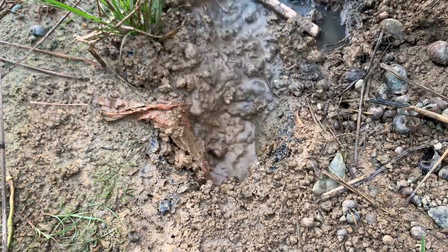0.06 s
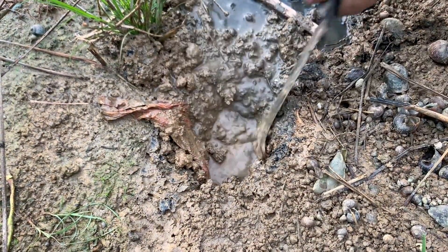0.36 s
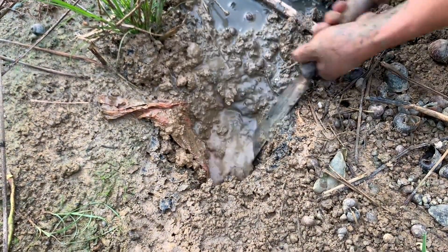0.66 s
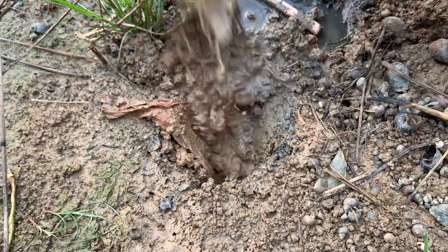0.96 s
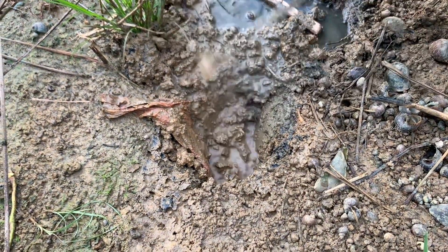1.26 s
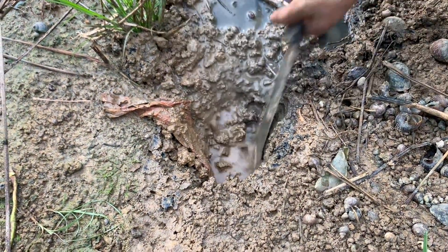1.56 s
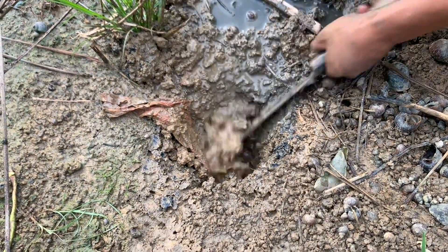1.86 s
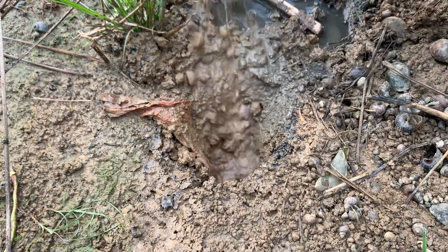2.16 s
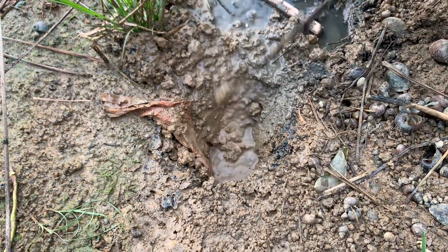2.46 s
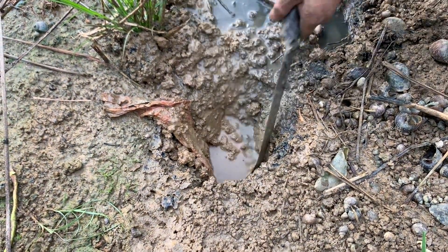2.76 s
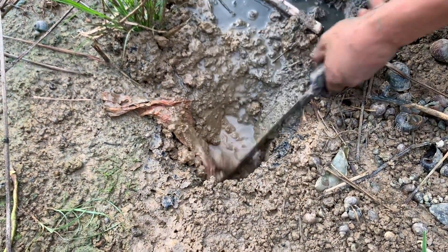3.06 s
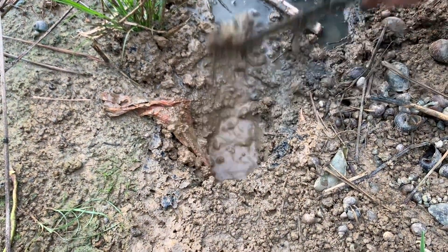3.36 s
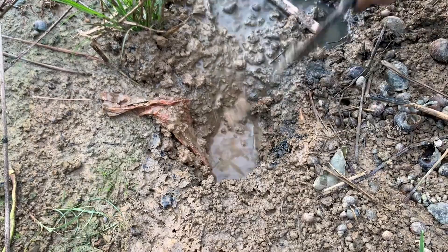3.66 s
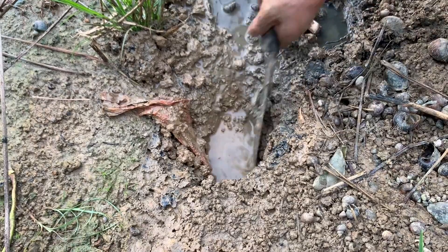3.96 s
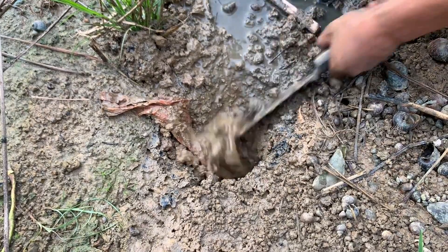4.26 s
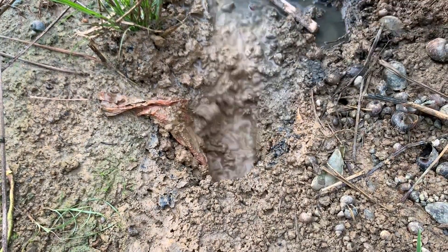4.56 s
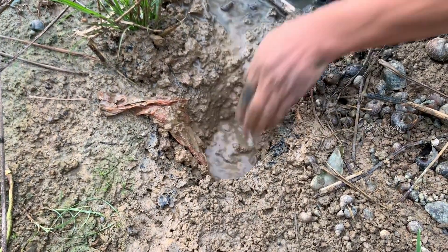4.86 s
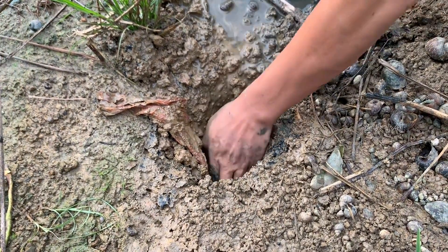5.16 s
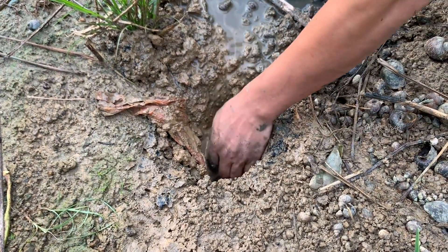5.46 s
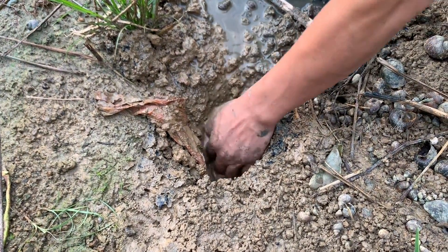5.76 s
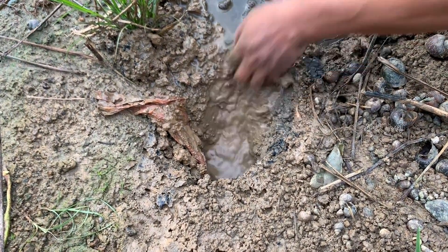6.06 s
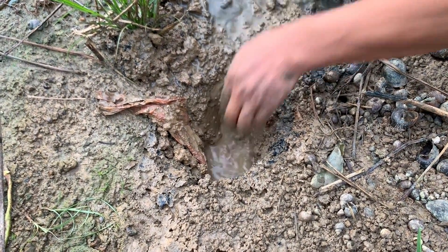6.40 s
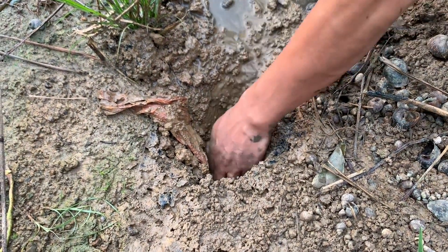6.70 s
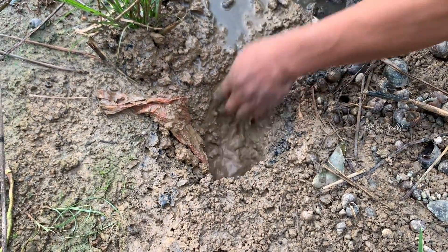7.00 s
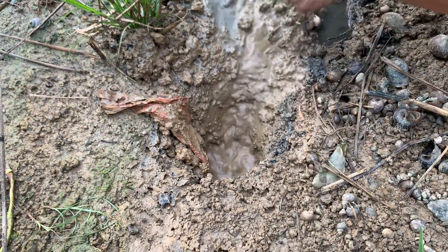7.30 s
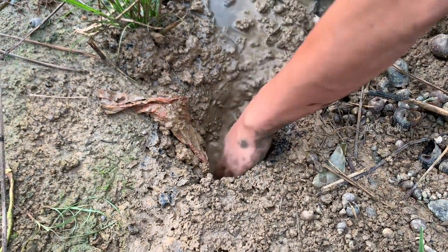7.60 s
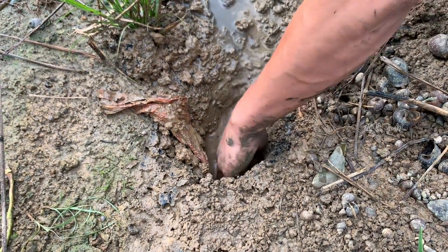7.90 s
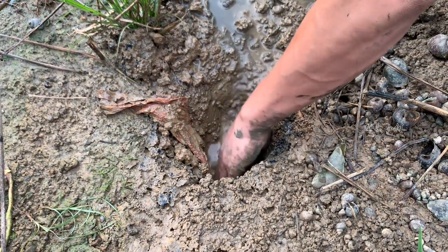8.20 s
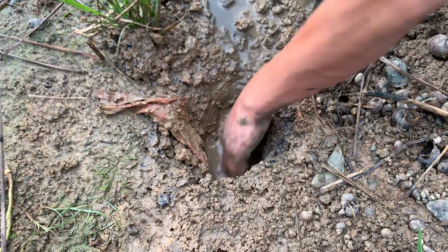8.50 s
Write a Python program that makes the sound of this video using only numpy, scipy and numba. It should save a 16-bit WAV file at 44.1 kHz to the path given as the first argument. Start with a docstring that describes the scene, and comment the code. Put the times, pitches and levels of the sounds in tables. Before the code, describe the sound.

Wet mud is dug from a small waterlogged hole outdoors, close to the microphone. From the start to about 4.8 seconds, a stick scoops in quick, irregular strokes that squelch, squish and crackle with grit, while clods smack down and small bubbles plip. The stick knocks on firm ground at about 1.4, 2.3, 2.7 and 3.7 seconds, hardest at 2.3. Around 5 seconds the digging drops to soft kneading by a bare hand. Two louder wet scoops follow near 6.2 and 7 seconds, then only faint ticks and one plip at 8.1.

Far off, a slow one-cylinder engine chugs throughout. Low traffic rumble and motor hum swell around 2 to 4 seconds, then ease, with a distant motor falling in pitch until about 7. Insects shrill faintly over soft outdoor air, and a small bird gives thin, raspy chirps at about 2 and 6 seconds.

```python
"""Wet mud, scooped from a small waterlogged hole by a stick, then a bare hand, close to the microphone.
It tears in tiny slips, crackles with bursting pockets and grit, and squishes through gaps;
clods smack down, bubbles plip, the stick knocks on firm ground.
Far off, a slow one-cylinder engine rings its exhaust and traffic rumbles by.
Insects shrill; a small bird calls twice."""
import sys
import numpy as np
from scipy import signal
from scipy.fft import rfft, irfft, next_fast_len
from scipy.io import wavfile
from scipy.ndimage import uniform_filter1d
from numba import njit

SR = 44100
rng = np.random.default_rng(int(sys.argv[2]) if len(sys.argv) > 2 else 0)


def inscribe(sig):
    """Save sig as 16-bit PCM at rate SR to the path in sys.argv[1].

    A 1-D sig is mono; a 2-D sig holds one channel per row.
    Samples are clipped to [-1, 1] before scaling.
    """
    pcm = np.round(np.clip(np.atleast_2d(sig).T, -1, 1) * 32767)
    wavfile.write(sys.argv[1], SR, pcm.astype(np.int16))


N = 376613
T = np.arange(N) / SR
FREQ = np.maximum(np.arange(N // 2 + 1) * SR / N, 1)

# wet mud spectrum: f/Hz, level/dB
SQUELCH = [(410, -35), (700, 6), (1110, -3.5), (2100, -5), (2330, -8), (3030, -4), (3740, -5), (5000, -5.5),
           (5830, -16.5), (7000, -3.5), (9100, -101), (15400, -120)]
# spectrum of grit and bursting films: f/Hz, level/dB
FIZZ = [(3240, -39), (5500, -9.5), (6070, -7.5), (7130, -16.5), (7930, -8), (9110, -6), (10500, -12.5),
        (11300, -27.5), (12600, -11), (13900, -16.5), (15200, -26), (16000, -39)]
# mud smacks: t/s, level/dB, ring f/Hz, treble offset/dB
SMACKS = [(0.131, -36, 3180, -6), (0.3928, -27.5, 3760, -17), (0.6482, -27.5, 1150, -18),
          (0.7545, -27, 3850, -26), (0.848, -35.5, 2100, 6.5), (0.86, -28, 1480, -20),
          (0.9016, -24.5, 4050, -14), (1.0342, -28.5, 2900, -14), (1.152, -30, 3140, -9),
          (1.1983, -29, 1260, -1.5), (1.3544, -27, 4400, -18), (1.439, -33, 3620, -18),
          (1.829, -37, 2070, -1), (2.081, -30, 1410, -12), (2.23, -35.5, 2900, -22),
          (2.673, -23, 3940, -16), (2.9718, -35.5, 3120, -11.5), (3.041, -24.5, 4700, -16),
          (3.113, -23, 4200, -8.5), (3.2012, -31.5, 3430, -2.5), (3.293, -33, 3700, -8),
          (3.7639, -28, 1300, -15), (4.2216, -34, 2900, -18), (4.3526, -42, 1600, -3),
          (4.553, -35.5, 2960, -7.5), (4.631, -35.5, 3020, -20), (5.9, -32, 1720, -16),
          (6.1346, -25, 1290, -5.5), (6.1348, -21, 3000, -20), (6.1535, -31, 2300, -20),
          (6.2598, -30.5, 1280, -14), (6.2987, -33, 4100, -24), (6.58, -38.5, 1460, -5.5),
          (6.8832, -29.5, 1560, -14), (6.9133, -28.5, 1490, -19), (6.9638, -32, 1700, -8),
          (7.1465, -30.5, 4200, -4.5), (7.164, -32, 1900, -10)]
# stick knocks: t/s, level/dB, favoured f/Hz, crack offset/dB, spray level/dB
KNOCKS = [(1.3994, -25, 4400, -3, -54), (2.2982, -14.5, 2700, -2, -48), (2.6704, -21, 1700, -12, -53),
          (3.7472, -16.5, 1400, -5, -41)]


def undb(db):
    """Decibels to gain."""
    return 10 ** (np.asarray(db) / 20)


def unit(x):
    """Scale to rms 1."""
    return x / np.sqrt(np.mean(x ** 2) + 1e-30)


def by_hz(table):
    """Table read at FREQ, on a log axis."""
    hz, value = np.transpose(table)
    return np.interp(np.log(FREQ), np.log(hz), value)


def filtered(x, response):
    """Apply a response given on FREQ."""
    size = next_fast_len(N + SR // 4)
    grid = np.arange(size // 2 + 1) * SR / size
    return irfft(rfft(x, size) * np.interp(grid, FREQ, response), size)[..., :N]


def coloured(x, spectrum, size=1024):
    """Minimum-phase filter: no ringing ahead of a click; white noise keeps its power."""
    hz, db = np.transpose(spectrum)
    grid = np.maximum(np.arange(size // 2 + 1) * SR / size, 1)
    cepstrum = irfft(np.log(undb(np.interp(np.log(grid), np.log(hz), db))))
    cepstrum[1:size // 2] *= 2
    cepstrum[size // 2 + 1:] = 0
    response = irfft(np.exp(rfft(cepstrum)))
    return signal.oaconvolve(x, response[None] / np.linalg.norm(response))[:, :N]


def resonance(hz, width_hz):
    """One resonance, gain 1 at centre."""
    return 1 / (1 + 1j * (FREQ ** 2 - hz ** 2) / (FREQ * width_hz))


def walk(rate_hz):
    """Smooth random wander, rms 1."""
    hold = int(SR / rate_hz)
    steps = np.repeat(rng.standard_normal(N // hold + 1), hold)
    return unit(uniform_filter1d(steps, hold)[:N])


def gate(start_s, hold_s, attack_s, release_s):
    """Envelope: exponential rise up to start_s, hold, exponential decay."""
    before = np.maximum(start_s - T, 0) / attack_s
    after = np.maximum(T - start_s - hold_s, 0) / release_s
    return np.exp(-np.minimum(before + after, 30))


def sine(hz):
    """Sine along a pitch curve."""
    return np.sin(2 * np.pi * np.cumsum(hz) / SR)


def diffuse_noise():
    """Stereo noise of a far sound field."""
    # left-right likeness: f/Hz, coherence
    coherence = [(30, 0.96), (60, 1), (130, 0.89), (290, 0.94), (640, 0.38), (1410, -0.37), (3100, 0.12),
                 (15000, 0.07)]
    alike = np.clip(by_hz(coherence), -1, 1)
    mid = filtered(rng.standard_normal(N), np.sqrt((1 + alike) / 2))
    side = filtered(rng.standard_normal(N), np.sqrt((1 - alike) / 2))
    return np.array([mid + side, mid - side])


def scatter(x, t60_s):
    """Short diffuse tail, different in each ear."""
    age = np.arange(SR // 6) / SR
    tail = rng.standard_normal((2, len(age))) * undb(-60 * age / t60_s) * (age > .001)
    return signal.oaconvolve(x, tail / np.linalg.norm(tail, axis=1, keepdims=True), axes=1)[:, :N]


@njit
def rings(start_s, hz, cycles, gain, pan, rise):
    """Damped sines: 60 dB down after `cycles`, pitch up by the fraction `rise`."""
    out = np.zeros((2, N))
    for k in range(len(start_s)):
        first, count = int(start_s[k] * SR), int(cycles[k] * SR / hz[k]) + 2
        phase = 0.
        for i in range(max(0, min(count, N - first))):
            age = i / count
            phase += 2 * np.pi * hz[k] * (1 + rise * age) / SR
            sample = gain[k] * np.sin(phase) * np.exp(-6.9 * age) * (1 - np.exp(-phase / 7))
            out[0, first + i] += sample * (1 + pan[k])
            out[1, first + i] += sample * (1 - pan[k])
    return out


def grains(per_s, low_hz, high_hz, cycles, spread_db, rise, max_pan=.6):
    """Shower of tiny bursts of every size; even spectrum, rms 1."""
    when, pitch, life, strength, place = rng.random((int(per_s * N / SR), 5)).T
    hz = low_hz * (high_hz / low_hz) ** pitch
    ring_cycles = cycles * 2 ** (2 * life - 1)
    gain = undb(-spread_db * np.log(np.maximum(strength, .02))) * hz / np.sqrt(ring_cycles)
    return unit(rings(when * N / SR, hz, ring_cycles, gain, max_pan * (2 * place - 1), rise))


def slips(per_s, decay_s, spread_db):
    """Pressure envelope of many tiny slips, each a quick rise and fall; rms 1."""
    when, strength = rng.random((int(per_s * N / SR), 2)).T
    energy = undb(-2 * spread_db * np.log(np.maximum(strength, .015)))
    impulses = np.bincount((when * N).astype(int), energy, N)
    age = np.arange(SR // 50) / SR / decay_s
    power = signal.oaconvolve(impulses, age * np.exp(-2 * age))[:N]
    return unit(np.sqrt(np.abs(power)))


def strokes(attack_s=.03, release_s=.012, settle_db=-7, settle_s=.11, seep_db=(-63, -74.5)):
    """Squelch and fizz, relative dB: strokes bite, hold, let go; mud creeps back; water always seeps."""
    # strokes of stick, then hand: t/s, length/s, squelch/dB, fizz/dB
    scoops = [(0.002, 0.082, -47.5, -53.5), (0.116, 0.05, -49, -53), (0.351, 0.15, -52.5, -57),
              (0.521, 0.034, -44.5, -46.5), (0.668, 0.048, -47, -57), (0.72, 0.054, -45.5, -49.5),
              (0.817, 0.079, -43, -48), (0.932, 0.068, -50.5, -51.5), (1.032, 0.14, -54, -57.5),
              (1.176, 0.072, -47, -52), (1.386, 0.062, -47, -50.5), (1.518, 0.12, -49.5, -51),
              (1.682, 0.058, -49, -53), (1.817, 0.063, -42.5, -47), (1.957, 0.15, -45, -50.5),
              (2.132, 0.23, -49.5, -53.5), (2.673, 0.07, -47, -60), (2.798, 0.086, -42.5, -50),
              (2.999, 0.27, -50, -55), (3.074, 0.14, -49.5, -50), (3.26, 0.21, -53, -57),
              (3.559, 0.061, -54.5, -57), (3.756, 0.48, -56, -63), (4.101, 0.062, -51.5, -60),
              (4.191, 0.16, -46.5, -50), (4.363, 0.079, -48, -52.5), (4.493, 0.13, -55, -54.5),
              (4.698, 0.062, -55, -57), (5.027, 0.018, -61, -61.5), (5.742, 0.072, -58.5, -64.5),
              (5.898, 0.21, -52.5, -63.5), (6.134, 0.068, -46, -56), (6.241, 0.079, -48.5, -53),
              (6.522, 0.11, -55.5, -67), (6.872, .11, -52.5, -57), (7.01, 0.047, -43, -48),
              (7.146, 0.021, -45, -48), (7.245, 0.055, -50.5, -56)]
    power = np.outer(undb(seep_db) ** 2, np.ones(N))
    for start_s, length_s, squelch_db, fizz_db in scoops:
        span = slice(*np.searchsorted(T, [start_s - attack_s, start_s + length_s + 1]))
        bite = np.clip(1 + (T[span] - start_s) / attack_s, 0, 1)
        after_s = np.maximum(T[span] - start_s - length_s, 0)
        fade = np.maximum(np.exp(-after_s / release_s), undb(settle_db) * np.exp(-after_s / settle_s))
        power[:, span] += np.outer(undb([squelch_db, fizz_db]), bite * fade) ** 2
    return 10 * np.log10(power)


def digging(hard_db=-51, growth=1.1):
    """Mud tears in crackling slips; pockets pop in the wet mass, grit fizzes above."""
    squelch_db, fizz_db = strokes()
    surge_db = 2.3 * walk(45)
    tearing = slips(per_s=480, decay_s=.003, spread_db=2.6)
    pops = grains(per_s=700, low_hz=800, high_hz=6000, cycles=27, spread_db=2.3, rise=.18)
    grit = grains(per_s=800, low_hz=4500, high_hz=16000, cycles=42, spread_db=3.9, rise=.03)
    scraping = slips(per_s=450, decay_s=.001, spread_db=3.1)
    crackle = tearing * rng.standard_normal(N)
    scrape = scraping * rng.standard_normal(N)
    smear = .42 * rng.standard_normal((2, 2, N))
    # gentle kneading only smears; hard work tears and pops
    force = undb(growth * np.minimum(squelch_db - hard_db, 0))
    squelch = coloured(force * (.8 * pops + .58 * crackle) + smear[0], SQUELCH)
    fizz = coloured(.75 * grit + .55 * scrape + smear[1], FIZZ)
    return squelch * undb(squelch_db + surge_db - 7) + fizz * undb(fizz_db + surge_db - 5)


def engine(level_db=-46.7, puff_s=.012):
    """Each firing rings the exhaust with a thud and a gas puff; echoes from the land fill the gaps."""
    # firing rate: t/s, f/Hz
    firing = [(0, 24.06), (7.6, 24.06), (8.54, 23.95)]
    # exhaust resonances: f/Hz, width/Hz, level/dB
    exhaust = [(259.9, 7.6, -4.5), (490.5, 40, 0.5), (550, 42, -3.5), (653, 108, -14), (977, 32, -10),
               (1464.5, 88, -12.5), (2276, 270, -24), (3015, 120, -29.5)]
    firing_hz = np.interp(T, *np.transpose(firing))
    cycle = np.cumsum(firing_hz * (1 + .001904 * walk(5))) / SR % 1
    fires = np.diff(cycle, prepend=0) < 0
    pulses = unit(fires * undb(.94 * walk(18)))
    thumps = filtered(pulses, 1 / (1 + 1j * FREQ / 900))
    puffs = (unit(np.exp(-cycle / firing_hz / puff_s)) + .7) * diffuse_noise()
    pipe = sum((-1) ** k * undb(db) * resonance(hz, width_hz) ** 2
               for k, (hz, width_hz, db) in enumerate(exhaust))
    return unit(filtered(thumps + .75 * puffs, pipe)) * undb(level_db)


def motor_note(hz, db, waver, flutter_db, rate_hz):
    """Motor note wandering in pitch and level."""
    return unit(sine(hz * (1 + waver * walk(rate_hz)))) * undb(db + flutter_db * walk(rate_hz))


def drone(fade_s=.22):
    """Deep traffic drone; each note fades into the next."""
    # drone notes: t/s, length/s, f/Hz, level/dB
    notes = [(0, 1.53, 43.5, -30), (2.581, 0.54, 34.64, -26.5), (3.2, 2.6, 34.4, -35.5),
             (6.298, 1.1, 34.33, -37), (7.732, 1.03, 41.85, -34)]
    power = np.array([(undb(db) * gate(start_s, length_s, fade_s, fade_s)) ** 2
                      for start_s, length_s, _, db in notes])
    hz = np.array(notes)[:, 2] @ power / power.sum(0)
    return motor_note(hz, 10 * np.log10(power.max(0)), waver=.025, flutter_db=2, rate_hz=10)


def passing_motor(centre_hz=169.9, shift_hz=19, pass_s=2.4, glide_s=2.1, loudest_s=2.49):
    """Hum sinks from approaching to receding pitch; arrives fast, fades slowly with distance."""
    hz = centre_hz - shift_hz * np.tanh((T - pass_s) / glide_s)
    distance = (T - loudest_s) / np.where(T < loudest_s, 1, 2.14)
    db = -31 - 20 * np.log10(1 + distance ** 2)
    return motor_note(hz, db, waver=.05, flutter_db=3, rate_hz=30)


def traffic(bed_db=-56.5, crossover_hz=170, upper_follows=.73):
    """Dull rumble, swelling mostly in the bass as traffic passes, plus drone and motor hum."""
    # passing swells: peak t/s, half width/s, level/dB
    swells = [(.6, 0.99, -36.5), (1.63, 0.079, -26.5), (2.191, 0.12, -18), (3.2, 1, -31), (4.2, 0.12, -28),
              (5.1, 0.39, -34.5), (7.0, 0.16, -42.5)]
    # rumble spectrum: f/Hz, level/dB
    spectrum = [(12, -29.5), (20, -3), (85, 2), (129, -3), (164, -6), (248, -13.5), (346, -16), (440, -30),
                (484, -17.5), (558, -36.5), (585, -30), (900, -42), (1170, -50), (1980, -120)]
    power = sum(undb(db) ** 2 / (1 + ((T - peak_s) / width_s) ** 2) for peak_s, width_s, db in swells)
    bass_db = 10 * np.log10(undb(bed_db) ** 2 + power)
    upper_db = bass_db.mean() + upper_follows * (bass_db - bass_db.mean())
    noise = unit(filtered(diffuse_noise(), undb(by_hz(spectrum))))
    bass = filtered(noise, 1 / (1 + (FREQ / crossover_hz) ** 4))
    rumble = bass * undb(bass_db) + (noise - bass) * undb(upper_db)
    return undb(.8) * rumble + undb(-1.5) * (drone() + .8 * passing_motor())


def air(level_db=-51):
    """Soft, nearly steady outdoor air."""
    # air spectrum: f/Hz, level/dB
    spectrum = [(120, -22), (300, 7.5), (780, 6), (1250, 3), (2000, -4), (2900, -9), (4000, -16.5),
                (6500, -24), (10000, -44), (16000, -61)]
    return unit(filtered(diffuse_noise(), undb(by_hz(spectrum)))) * undb(level_db + .17 * walk(2.7))


def insects(period_s=.925, centre_s=5.57, duty=.53):
    """One insect trills in phrases, another holds a thin high note."""
    # bands of trill and note: f/Hz, width/Hz, level/dB
    bands = [(5100, 190, -77), (8450, 600, -81)]
    trill, note = (unit(filtered(rng.standard_normal((2, N)), resonance(hz, width_hz) ** 2)) * undb(db)
                   for hz, width_hz, db in bands)
    cycle = np.cos(2 * np.pi * (T - centre_s) / period_s)
    phrases = np.clip(.5 + 2 * (cycle - np.cos(np.pi * duty)), 0, 1)
    return trill * phrases * undb(2 + 2 * walk(40)) + note


def ticks(decay_s=.0011):
    """A grain slips or a mud film snaps: bright tick, no body."""
    # single snaps: t/s, level/dB
    snaps = [(0.014, -35.5), (0.728, -31.5), (1.236, -37), (1.54, -33), (1.584, -35), (2.296, -25),
             (2.3105, -35), (2.3209, -26), (2.539, -48), (2.803, -36), (2.863, -38), (3.365, -37.5),
             (3.765, -37), (4.2223, -31), (4.416, -37), (5.7354, -46), (6.17, -29), (6.54, -41),
             (6.785, -42.5), (7.231, -37), (7.6, -47.5), (8.087, -46), (8.103, -52), (8.124, -50)]
    envelope = sum(undb(db) * gate(start_s, 0, .0005, decay_s) for start_s, db in snaps)
    return coloured(envelope * rng.standard_normal((1, N)), FIZZ)


def squishes(relative_width=.22, gain_db=-2.5):
    """Mud and water rush through a gap; its resonance glides as it opens or closes."""
    # squeezes: t/s, core length/s, start f/Hz, end f/Hz, level/dB
    squeezes = [(.08, .025, 3200, 4200, -50), (.673, .014, 3500, 3300, -46), (.674, .026, 750, 1000, -45),
                (.818, .022, 2700, 3400, -46), (1.345, .025, 5800, 5800, -46),
                (2.715, .022, 4700, 4500, -49), (3.01, .045, 4400, 4400, -47), (3.38, .07, 3200, 3600, -58),
                (4.15, .05, 1900, 2200, -50), (4.31, .06, 2200, 1500, -52), (4.76, .09, 1100, 1100, -55),
                (5.11, .1, 1400, 1400, -55), (5.45, .08, 1100, 1100, -54), (6.252, .03, 1500, 2600, -46),
                (6.275, .04, 3900, 4500, -50), (6.848, .016, 2000, 2700, -46),
                (6.88, .014, 2900, 2500, -44), (7.015, .04, 4400, 3400, -47),
                (7.148, .025, 2500, 3200, -48)]
    pressure = slips(per_s=330, decay_s=.0007, spread_db=1)
    rush = pressure * (rng.standard_normal(N) + 1j * rng.standard_normal(N))
    out = np.zeros(N)
    for start_s, core_s, start_hz, end_hz, db in squeezes:
        span = slice(int((start_s - core_s / 4) * SR), min(int((start_s + core_s * 5 / 4) * SR), N))
        lowpass = signal.butter(2, relative_width * start_hz / 2, fs=SR, output="sos")
        flutter = signal.sosfilt(lowpass, rush[span])
        hz = np.geomspace(start_hz, end_hz, len(flutter))
        burst = np.real(flutter * np.exp(2j * np.pi * np.cumsum(hz) / SR))
        out[span] += undb(db + gain_db) * unit(burst * np.hanning(len(burst)))
    return out


def smacks(crack_s=.0013, spatter_s=.009, spatter_db=-23, cycles=22, overtone=1.5, overtone_db=-6):
    """A clod lands: sharp crack, short spatter, two resonances of the pocket it closes."""
    start_s, db, hz, treble_db = np.transpose(SMACKS)
    age = np.arange(SR // 20) / SR
    decay = np.exp(-age / crack_s) + undb(spatter_db) * np.exp(-age / spatter_s)
    envelope = decay * (1 - np.exp(-age / .00025))
    noise = rng.standard_normal((len(hz), 2, len(age)))
    body, treble = np.zeros((2, 1, N + len(age)))
    for k, first in enumerate((start_s * SR).astype(int)):
        span = slice(first, first + len(age))
        # a pocket radiates little below its own pitch
        band = signal.butter(2, [min(.85 * hz[k], 2600), 4600], "bandpass", fs=SR, output="sos")
        body[0, span] += undb(db[k] - 6.5) * envelope * unit(signal.sosfilt(band, noise[k, 0]))
        treble[0, span] += undb(db[k] + treble_db[k] + 5.5) * envelope * noise[k, 1]
    life, pan = np.full(len(hz), cycles), np.zeros(len(hz))
    ring = rings(start_s, hz, life, undb(db), pan, rise=.037)
    ring += rings(start_s, hz * overtone, life * overtone, undb(db + overtone_db), pan, rise=.071)
    return body[:, :N] + coloured(treble, FIZZ) + ring


def thuds(hz=700, width_hz=800, decay_s=.0025, level_db=-40, follows=.5):
    """Soft ground answers each blow with a dead knock; it yields to the hardest."""
    power = sum((undb(follows * (db + 25)) * gate(start_s, 0, .0005, decay_s)) ** 2
                for start_s, db, *_ in SMACKS + KNOCKS)
    ground = unit(filtered(rng.standard_normal(N), resonance(hz, width_hz) ** 2))
    return undb(level_db) * np.sqrt(power) * ground


def bubbles(cycles_at_1khz=34, rise=.07, snap_db=-13, snap_s=.002):
    """Larger air pockets snap open in the water, ring briefly and rise in pitch."""
    # air pockets: t/s, level/dB, f/Hz
    pockets = [(0.5504, -36, 870), (0.649, -32, 1700), (0.794, -36, 1600), (0.8595, -34, 1130),
               (0.883, -35.5, 3180), (0.959, -37, 1450), (1.956, -29, 3600), (1.974, -34, 2050),
               (2.035, -34, 3170), (3.125, -31, 3720), (3.14, -32.5, 3030), (4.331, -39.5, 1670),
               (4.518, -36, 2950), (6.1534, -30, 1184), (6.264, -39, 3350), (6.847, -27.5, 1960),
               (6.912, -33, 775), (7.02, -36, 4100), (7.041, -36, 2550), (7.156, -36, 1830),
               (7.279, -32.5, 1344), (8.103, -28.5, 3490)]
    start_s, db, hz = np.transpose(pockets)
    pan = rng.uniform(-.13, .49, len(hz))
    out = rings(start_s, hz, cycles_at_1khz * np.sqrt(hz / 1000), undb(db + 4), pan, rise)
    age = np.arange(SR // 40) / SR
    bursts = rng.standard_normal((len(hz), len(age))) * np.exp(-age / snap_s)
    for k, first in enumerate((start_s * SR).astype(int)):
        band = signal.butter(2, [.6 * hz[k], 2.2 * hz[k]], "bandpass", fs=SR, output="sos")
        snap = signal.sosfilt(band, bursts[k]) * np.sqrt(SR / (3.2 * hz[k]))  # power restored
        out[:, first:first + len(age)] += undb(db[k] + snap_db) * snap
    return out


def knocks(crack_s=.0011, reach_octaves=1.1, spray_s=.018):
    """Stick on firm ground: crack, woody ring, mud spray; each contact favours other modes."""
    # knock modes: f/Hz, level/dB, t60/s
    modes = [(980, -9, .012), (1440, -2, .017), (2000, -3.5, .012), (2800, -3, .01), (3280, -4, .011),
             (3900, -6, .009)]
    start_s, db, favoured_hz, crack_db, spray_db = np.transpose(KNOCKS)
    ring = 0
    for k, (mode_hz, mode_db, t60_s) in enumerate(modes):
        octaves = np.log2(mode_hz / favoured_hz)
        gain = (-1) ** k * undb(db + mode_db) / (1 + (octaves / reach_octaves) ** 2)
        hz = mode_hz * (1 + .01 * rng.standard_normal(len(db)))
        ring = ring + rings(start_s, hz, hz * t60_s, gain, pan=np.zeros(len(db)), rise=0.)
    crack = sum(undb(level) * gate(t, 0, .0001, crack_s) for t, level in zip(start_s, db + crack_db))
    spray = sum(undb(level) * gate(t, spray_s, .0002, .004) for t, level in zip(start_s, spray_db))
    return (ring + coloured(crack * rng.standard_normal((1, N)), FIZZ)
            + coloured(spray * rng.standard_normal((2, N)), SQUELCH))


def bird(rasp=.026):
    """Two calls of thin, rasping notes that slide up and down."""
    # bird notes: t/s, length/s, start f/Hz, end f/Hz, level/dB
    chirps = [(1.86, 0.025, 5150, 5550, -51), (1.897, 0.067, 6350, 5300, -46),
              (2.089, 0.045, 5050, 5500, -52), (2.132, 0.065, 6250, 5150, -43),
              (6.016, 0.041, 7200, 5840, -59), (6.086, 0.04, 3730, 5330, -55),
              (6.142, 0.054, 6260, 5140, -48), (6.203, 0.094, 7060, 5830, -48.5),
              (6.295, 0.075, 3900, 5340, -56), (6.336, 0.08, 6900, 4640, -55)]
    out = np.zeros(N)
    waver = 1 + rasp * walk(1400)
    for start_s, length_s, start_hz, end_hz, db in chirps:
        first, count = int(start_s * SR), int(length_s * SR)
        span = slice(first, first + count)
        hz = np.geomspace(start_hz, end_hz, count) * waver[span]
        out[span] += undb(db) * np.hanning(count) * sine(hz)
    return undb(-1.5) * out + undb(-2.5) * scatter(np.array([out, out]), t60_s=.089)


def slowing_motor():
    """A far motor eases off; its notes swell and sink."""
    # motor glides: t/s, length/s, start f/Hz, end f/Hz, level/dB
    glides = [(4.243, 0.56, 338, 327.3, -44.5), (4.5, 0.87, 287, 259.4, -46), (5.249, .5, 262, 183, -47),
              (6.123, .7, 422, 294.6, -48)]
    out = np.zeros(N)
    waver = 1 + .015 * walk(30)
    flutter_db = 2.5 * walk(14)
    for start_s, length_s, start_hz, end_hz, db in glides:
        first, count = int(start_s * SR), int(length_s * SR)
        span = slice(first, first + count)
        hz = np.geomspace(start_hz, end_hz, count) * waver[span]
        out[span] += undb(db + flutter_db[span]) * np.hanning(count) * sine(hz)
    return out


def hole(x, echo_db=-7):
    """The microphone ports hear the hole at an angle; walls and ground scatter a very short tail."""
    # lead of the left port: f/Hz, phase/rad
    lead = [(100, 0), (2000, 1.1), (4200, 1.7), (6000, 4), (8000, 4.9), (10000, 5.7), (14000, 7.3)]
    direct = np.array([filtered(x[0], np.exp(1j * by_hz(lead))), x[1]])
    return direct + undb(echo_db) * scatter(x, t60_s=.049)


def lean(pair):
    """Far sounds lean left, mainly in the midrange."""
    # balance: f/Hz, left minus right/dB
    balance = [(30, -2), (120, 1.5), (250, -1), (500, 6), (1200, 3), (4000, -1.5)]
    half_db = by_hz(balance) / 2
    return np.array([filtered(pair[0], undb(half_db)), filtered(pair[1], undb(-half_db))])


def scene():
    """Digging close by, countryside around it."""
    near = hole(digging() + smacks() + ticks() + knocks() + thuds() + squishes() + bubbles())
    far = lean(engine() + traffic() + slowing_motor() + air() + insects())
    return near + far + bird()


def record(dry):
    """Steep recorder low-pass at 15.7 kHz."""
    return signal.sosfilt(signal.ellip(8, .2, 70, 15700, fs=SR, output="sos"), dry)


dry = scene()
out = record(dry)
inscribe(out)
```